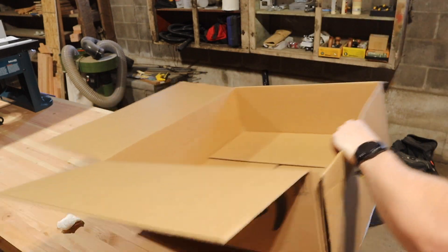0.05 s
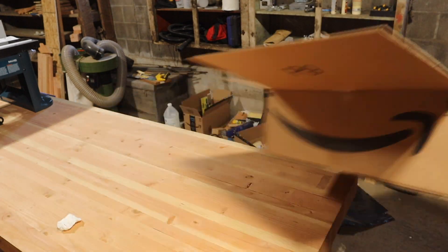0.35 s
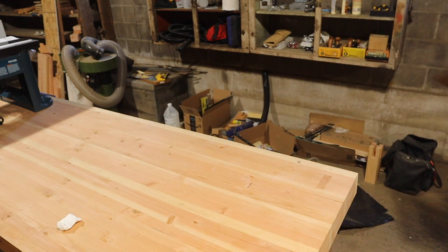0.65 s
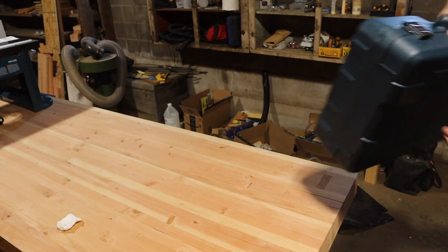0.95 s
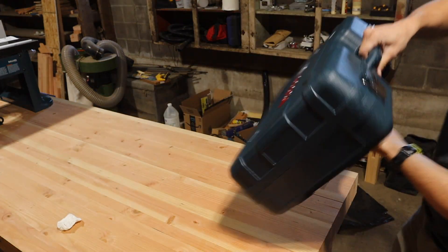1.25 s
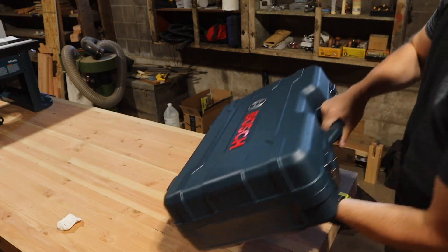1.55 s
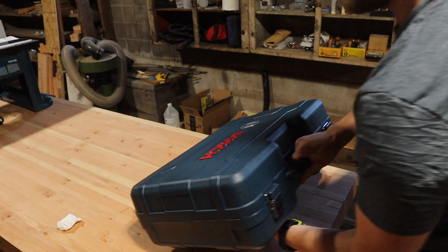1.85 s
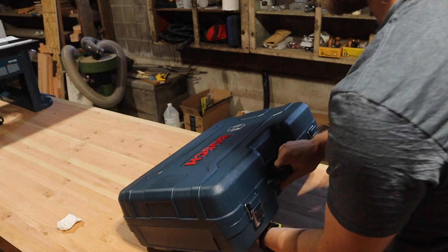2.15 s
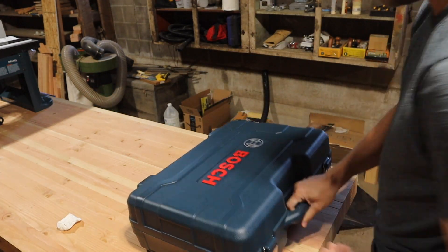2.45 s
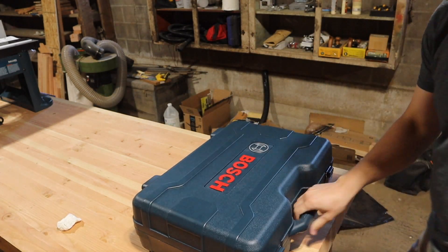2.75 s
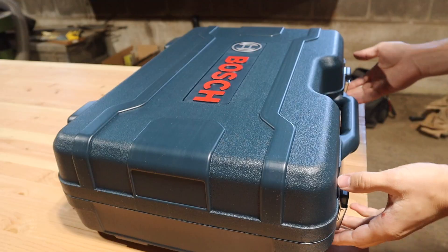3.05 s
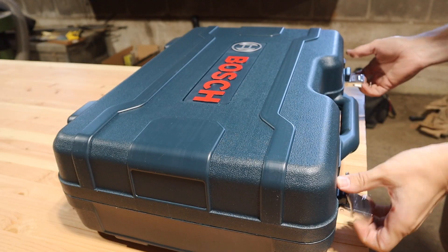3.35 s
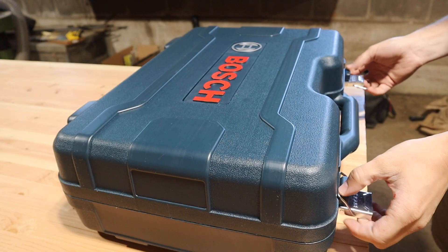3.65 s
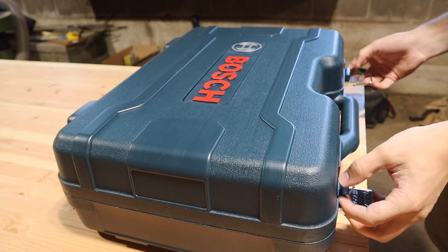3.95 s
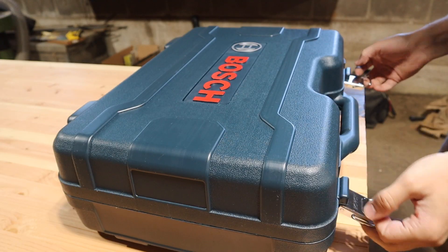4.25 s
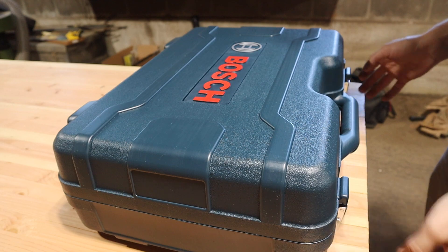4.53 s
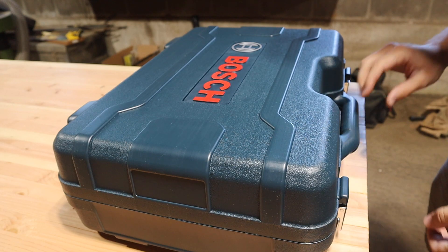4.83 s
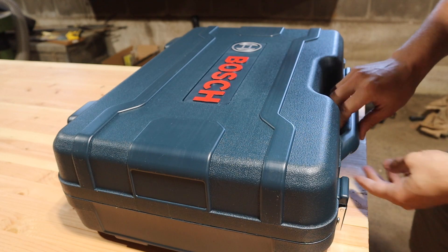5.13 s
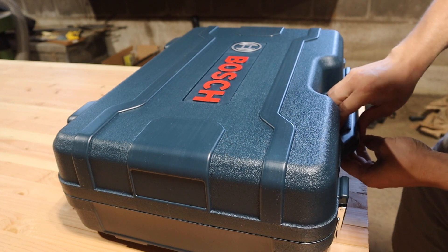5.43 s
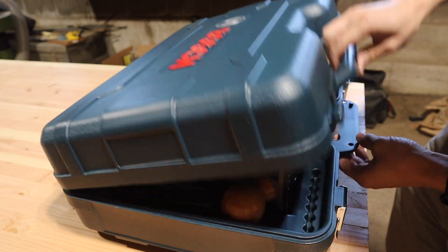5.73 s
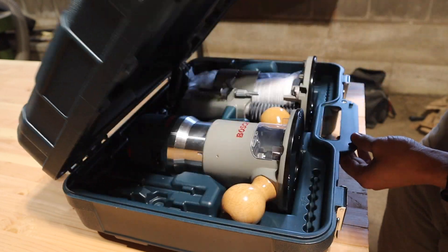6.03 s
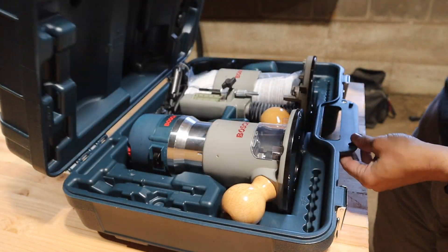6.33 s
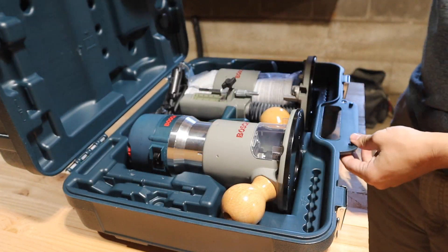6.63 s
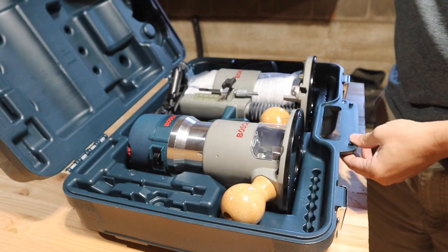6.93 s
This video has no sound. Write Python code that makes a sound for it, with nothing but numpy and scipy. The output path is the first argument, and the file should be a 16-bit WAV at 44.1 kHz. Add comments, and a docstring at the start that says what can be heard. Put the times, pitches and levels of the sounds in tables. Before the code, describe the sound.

A hollow plastic case thuds onto a wooden workbench, then two steel latches snap open and the lid lifts softly.

```python
"""In a block-walled workshop with a low motor hum, a cardboard box slides off a wooden workbench.
A hard plastic tool case is bumped, dragged and dropped flat on the bench; its hollow shell booms.
Two steel latches snap open, ring, jingle on their wire loops and fall against the shell.
Then the lid is raised with a small pop and a rustle. The walls echo, and the microphone is so
close that the loudest snaps overload it."""
import sys
import numpy as np
from scipy import signal
from scipy.fft import rfft, irfft, next_fast_len
from scipy.io import wavfile
from scipy.ndimage import uniform_filter1d, minimum_filter1d

SR = 44100
rng = np.random.default_rng(int(sys.argv[2]) if len(sys.argv) > 2 else 0)


def inscribe(sig):
    """Save sig as 16-bit PCM at rate SR to the path in sys.argv[1].

    A 1-D sig is mono; a 2-D sig holds one channel per row.
    Samples are clipped to [-1, 1] before scaling.
    """
    pcm = np.round(np.clip(np.atleast_2d(sig).T, -1, 1) * 32767)
    wavfile.write(sys.argv[1], SR, pcm.astype(np.int16))


N = 308167
TIME = np.arange(N) / SR
AGE = TIME[:SR // 3]  # seconds since a hit
EDGES = 30 * 2 ** np.arange(0, 9.6, .5)  # borders of half-octave bands, in Hz
CENTRES = np.sqrt(EDGES[1:] * EDGES[:-1])
BAND_FILTERS = [signal.butter(2, pair, "band", fs=SR, output="sos") for pair in zip(EDGES, EDGES[1:])]
# the case comes to rest; the hand takes the far latch; it lets that latch drop
SETTLED_S, FAR_LATCH_S, DROP_S = 3.0, 4.14, 4.595

# the case bumps the bench, hands and lid bump the case:
# t/s, level/dB, bass boost/dB, treble boost/dB, rebound against first hit/dB
KNOCKS = [(0.723, -32.5, -5, -12, -18), (1.145, -18, 4, -13, -4.5), (1.198, -28, 11.5, -20, -18),
          (1.377, -24, 15, 1.5, -7), (1.413, -2.5, -1, -25, -13.5), (1.973, -10, 4, -9, -12.5),
          (2.114, -28.5, 10, -6, -10), (2.305, -21, -5, -11.5, -6), (2.549, -18, 2, -3, -1),
          (2.595, 0.5, -2.5, 4.5, 0.5), (2.663, -11, 11.5, 1, -10), (3.08, -27.5, 6, -7, -14),
          (3.146, -21.5, -4, 0, 4), (3.533, -2.5, -17, -5.5, -29), (3.71, -17.5, -5, -6, -18.5),
          (4.357, -26.5, 1.5, -9.5, -3), (4.408, -22.5, -8, -13, -11.5), (4.514, -21.5, 6, -3.5, -9),
          (5.223, -45.5, 23.5, 2, -5), (5.345, -38.5, 14.5, -3, -8), (5.431, -37, -3, -4, -14),
          (5.572, -23.5, -5, -22, 2), (5.655, -33.5, 6, -21, -10), (6.799, -17, -11, -41, -26)]
# the notes (modes) of the hollow shell: f/Hz, level/dB, t60/s (the time to fade by 60 dB)
SHELL_MODES = [(122, -5.5, 0.056), (152.7, -9, 0.27), (178.4, -2, 0.34), (236.4, -2, .2), (316.5, -2, .18),
               (369.5, 6, 0.044), (512, -0.5, 0.13), (572, -3.5, 0.2), (660, -1.5, 0.19), (801, -10, 0.085),
               (914, 0.5, 0.14), (1060, -9.5, .09), (1260, -23, .1), (1484, -13, 0.055),
               (1715, -11.5, 0.023), (2430, -22, 0.048)]
# how long its many weaker notes last: f/Hz, t60/s
SHELL_T60 = [(100, 0.19), (500, .085), (2000, 0.053), (10000, 0.044)]
# a latch lever springs open or falls on the shell:
# t/s, steel level/dB, ring boost/dB, shell level/dB, bass boost/dB, scrape level/dB
SNAPS = [(3.3374, 5.5, 3.5, -1.5, 3, -15), (3.396, 4.5, -1, -7.5, 5.5, -7), (4.5993, -1, 1.5, -3, 1, -13),
         (4.833, -5, -14.5, -9.5, 4, -48)]
# each snap is a release, a slap and two bounces: delay/s, steel change/dB, shell change/dB
SNAP_CONTACTS = [(0, -1, -0.5), (.0072, -4, -2), (.017, -11.5, -15.5), (.031, -15, -26)]
# a held latch ticks against its catch: t/s, steel level/dB, shell level/dB
TICKS = [(3.264, -15, -35.5), (3.3026, -16.5, -21.5), (3.354, 1, -14), (3.4498, -7, -14),
         (3.5324, -11, -27.5), (3.728, -19.5, -17), (3.763, -17.5, -34.5), (3.813, -21, -35.5),
         (3.8637, -16.5, -25), (3.9498, -21.5, -27), (4.0583, -23.5, -43), (4.1179, -22.5, -27.5),
         (4.1475, -13.5, -23), (4.3378, -30, -47.5), (4.38, -29, -42), (4.588, -12.5, -21.5),
         (4.8555, -8.5, -40), (5.1968, -36.5, -39.5), (5.2516, -32, -40)]
# a loose wire loop jingles: t/s, length/s, steel level/dB, shell level/dB
JINGLES = [(2.596, .02, -17.5, -35), (4.184, .052, -23.5, -28.5), (4.434, .05, -26.5, -42),
           (4.507, .02, -21.5, -35)]
# the notes of the two latches: f/Hz, level/dB, t60/s
NEAR_LATCH_MODES = [(3120, -8, 0.04), (4680, -14, 0.04), (6300, -13.5, 0.017), (7920, -8.5, 0.09),
                    (8840, -8.5, 0.061), (8510, 0.5, 0.019), (8160, -0.5, 0.045), (9400, -13, 0.056),
                    (12060, -12, 0.026), (13500, -5.5, 0.023), (14700, -18, .04), (15400, -18.5, 0.027)]
FAR_LATCH_MODES = [(3040, -16, .12), (4905, -13, .3), (5440, -22, .06), (6440, -23, .12), (7520, -19, .2),
                   (7850, -17, .2), (8403, -1, .18), (9300, -15, .14), (11690, -18, .17), (12000, -22, .2),
                   (13530, -16, .13), (13820, -12, .2), (14700, -21, .09), (15300, -14, .12)]
# the wire loop slides on its catch: t/s, length/s, level/dB
SLIDES = [(3.807, 0.011, -43), (3.847, .016, -43), (3.932, .018, -52.5), (4.108, 0.0098, -46),
          (4.155, 0.066, -45.5), (4.432, 0.12, -46.5)]
# box, case and palms drag under pressure: t/s, length/s, level/dB
DRAGS = [(0, 0.024, -45.5), (0.125, 0.083, -42.5), (1.29, .1, -53), (1.937, 0.26, -40), (2.19, .1, -44.5),
         (2.306, 0.053, -39.5), (3.203, 0.82, -46), (4.563, 0.025, -30), (4.696, 0.42, -50.5),
         (5.533, 0.052, -45), (6.43, 0.037, -57.5), (6.726, 0.054, -53), (6.796, .2, -50.5)]
# cardboard, sleeves and palms brush past: peak t/s, rise/s, level/dB, hiss against rustle/dB
STROKES = [(0.017, 0.033, -42.5, -0.5), (.175, 0.057, -47.5, -0.5), (0.448, 0.01, -44, -9.5),
           (0.811, 0.029, -50.5, -6.5), (1.144, 0.017, -48.5, -4), (1.42, 0.074, -53.5, -4),
           (1.547, 0.0054, -46.5, -6.5), (2.375, 0.077, -47, -1.5), (3.08, 0.0027, -53.5, -2),
           (3.155, .012, -49, -7), (5.585, .02, -57, -5.5), (6.28, .18, -57.5, -9),
           (6.458, 0.019, -60.5, -10.5), (6.96, .16, -58.5, -5.5)]
# plastic and cardboard squeak: t/s, length/s, f/Hz, level/dB
SQUEAKS = [(0.446, 0.007, 3120, -52), (0.98, 0.0068, 2170, -49), (2.043, 0.0028, 1750, -38.5),
           (2.053, 0.0064, 1775, -33), (2.113, 0.0031, 1610, -41), (2.194, 0.005, 1737, -37.5),
           (2.239, 0.0031, 1600, -44), (5.578, 0.017, 1368, -43)]
# small dry pops: t/s, level/dB
POPS = [(1.01, -37.5), (6.2619, -31.5)]
# tone colours, or how strong each sound is from low to high: f/Hz, level/dB
SHELL_COLOUR = [(40, -23.5), (90, -23), (140, 6), (260, 6.5), (450, 6), (1000, 2), (2000, -5.5),
                (4000, -13.5), (8000, -36.5), (11000, -42), (15000, -44)]
CRACK_COLOUR = [(300, 4), (1200, 3.5), (3200, -3), (6000, -3.5), (8200, 4), (10800, -15.5), (14000, -4.5)]
RUSTLE_COLOUR = [(200, -11), (800, 1), (1200, -2.5), (1750, 3), (2250, -1.5), (3000, -0.5), (3700, -4.5),
                 (4600, -2.5), (8000, -32.5), (15000, -31.5)]
HISS_COLOUR = [(1000, -14), (4000, -3), (8000, 2.5), (10500, -6), (15000, -8)]
DRAG_COLOUR = [(50, -12), (110, 2.5), (350, 5.5), (700, -5.5), (1500, -13), (4000, -28), (12000, -45.5)]
BENCH_COLOUR = [(35, -16), (70, 0.5), (150, -1.5), (300, -22.5), (1000, -56.5)]
AIR_COLOUR = [(30, -22), (85, -0.5), (170, -7), (400, -10.5), (1200, -18.5), (4000, -26.5), (9000, -29.5),
              (15000, -36)]
# how long the room echoes: f/Hz, t60/s
ROOM_T60 = [(100, 0.23), (300, 0.92), (1000, 0.72), (3000, 0.58), (8000, .44), (15000, 0.24)]
# the echo against the direct sound: f/Hz, level/dB
ECHO_LEVEL = [(90, -14.5), (170, -4.5), (270, -9.5), (500, -9), (1000, -8.5), (2500, -10.5), (8000, -11),
              (15000, -25.5)]
# the part of the echo that is scattered into noise: f/Hz, share from 0 to 1
ECHO_SCATTER = [(100, 0.89), (900, 0.78), (5000, 0.78), (9000, 0.042)]
# the echo dips briefly: t/s, level/dB
ECHO_DIP = [(2.95, 0), (2.96, -13), (3.07, -13), (3.08, 0)]
# the level of the motor hum over time: t/s, level/dB
HUM_LEVEL = [(0, -69), (2.8, -66.5), (3.0, -59.5), (7, -54.5)]


def case_knocks(rebound_s=.019, rebound_bass_db=6, rebound_treble_db=-2):
    """List the blows on the case: after each knock it lands on its other edge, deeper and duller."""
    blows = []
    for s, db, bass_db, treble_db, rebound_db in KNOCKS:
        blows.append((s, db, bass_db, treble_db))
        blows.append((s + rebound_s, db + rebound_db,
                      bass_db + rebound_bass_db, treble_db + rebound_treble_db))
    return blows


def shell(blows, pulse_db=8, crowd_db=14, modes_db=12, rise_cycles=0.26):
    """A blow on the plastic shell makes one thump, a few clear notes and a crowd of short ones."""
    out, band_hiss = np.zeros(N), band_noise(N + len(AGE))
    hz, mode_db, t60 = np.transpose(SHELL_MODES)
    cycles = hz[:, None] * AGE
    rings = unit_energy(np.sin(2 * np.pi * cycles) * (1 - np.exp(-2 * cycles)) * fade(AGE, t60))
    impulse = 1. * (AGE == 0)
    pulses = [signal.sosfilt(sos, impulse) * (-1) ** k for k, sos in enumerate(BAND_FILTERS)]
    pulses = unit_energy(np.array(pulses))
    crowd_rise = 1 - np.exp(-CENTRES[:, None] * AGE / rise_cycles)
    crowd_shape = crowd_rise * fade(AGE, at_hz(SHELL_T60, CENTRES))
    colour = unit_energy(from_db(at_hz(SHELL_COLOUR, CENTRES)) * np.sqrt(CENTRES))
    for s, db, bass_db, treble_db in blows:
        # only the moving case has the weight to shake the bench
        deep_db, lowest_hz = (-12, 115) if s > SETTLED_S else (5, 35)
        start = int(s * SR)
        bands = colour * blow_tone(CENTRES, bass_db, deep_db, treble_db)
        crowd = bands @ unit_energy(band_hiss[:, start:start + len(AGE)] * crowd_shape)
        # where the blow lands sets how strongly each note answers
        shares = unit_energy(from_db(mode_db + 2.5 * rng.standard_normal(len(hz))))
        shares *= rng.choice([-1, 1], len(hz))
        modes = shares * blow_tone(hz, bass_db, deep_db, treble_db) @ rings
        blow = from_db(pulse_db) * bands @ pulses + from_db(crowd_db) * crowd + from_db(modes_db) * modes
        add(out, s, cut_bass(from_db(db) * blow, lowest_hz))
    return out


def blow_tone(hz, bass_db, deep_db, treble_db, pivot_hz=350, treble_hz=3000, bend=0.91):
    """A heavy blow is stronger below the pivot pitch; a hard blow is brighter above it."""
    height = np.maximum(np.log(hz / pivot_hz), 0) / np.log(treble_hz / pivot_hz)
    weight_db = at_hz([(70, bass_db + deep_db), (150, bass_db), (pivot_hz, 0)], hz)
    hardness_db = np.minimum(treble_db * height ** bend, max(treble_db, 0))
    return from_db(weight_db + hardness_db)


def latch_contacts(snap_treble_db=7.5, tick_ring_db=-13, jingle_ring_db=2,
                   gap_s=.0148, jitter_s=.001, uneven_db=3, loss_db=1.3):
    """List every snap, tick and jingle: each one clicks the steel and gives the shell a blow."""
    clicks, blows = [], []
    light_bass_db, light_treble_db = 2, 2.5
    for s, steel_db, ring_db, shell_db, bass_db, _ in SNAPS:
        for delay_s, steel_step_db, shell_step_db in SNAP_CONTACTS:
            clicks.append((s + delay_s, steel_db + steel_step_db, ring_db))
            blows.append((s + delay_s, shell_db + shell_step_db, bass_db, snap_treble_db))
    for s, steel_db, shell_db in TICKS:
        clicks.append((s, steel_db, tick_ring_db))
        blows.append((s, shell_db, light_bass_db, light_treble_db))
    for s, length_s, steel_db, shell_db in JINGLES:
        for k, (late, strong) in enumerate(rng.standard_normal(size=(6, 2))):
            if k * gap_s < length_s:
                touch_s = s + k * gap_s + jitter_s * late
                touch_db = uneven_db * strong - k * loss_db
                clicks.append((touch_s, steel_db + touch_db, jingle_ring_db))
                blows.append((touch_s, shell_db + touch_db, light_bass_db, light_treble_db))
    return clicks, blows


def latches(clicks, crack_db=4, clink_db=4, near_db=9, far_db=12, lead_s=0.0045, scrape_s=0.0064):
    """Steel hits steel with a crack, a clink and a ring; each snap also scrapes for a moment."""
    out, grit = np.zeros(N), noise(CRACK_COLOUR)
    for s, db, ring_db in clicks:
        crack = unit_energy(grit[int(s * SR):][:len(AGE)] * fade(AGE, t60=0.028)[0])
        if s < FAR_LATCH_S:
            ring = from_db(near_db) * steel_ring(NEAR_LATCH_MODES, strain=0.031)
        elif s < DROP_S:  # fingers damp and bend the far latch until it drops
            ring = from_db(far_db) * steel_ring(FAR_LATCH_MODES, strain=0.008, length_share=0.44)
        else:
            ring = from_db(far_db) * steel_ring(FAR_LATCH_MODES, strain=0.0025)
        click = from_db(crack_db) * crack + from_db(clink_db) * clink() + from_db(ring_db) * ring
        add(out, s, from_db(db) * click)
    for s, *_, scrape_db in SNAPS:
        # the lever scrapes over its catch, harder and harder until it lets go
        pressure = np.minimum(AGE / lead_s, 1) ** 2 * burst(lead_s + scrape_s)
        scrape = grit[rng.integers(N - len(AGE)):][:len(AGE)]
        add(out, s - lead_s, from_db(scrape_db) * pressure * scrape)
    return cut_bass(out, lowest_hz=500)  # parts this small give off no bass


def steel_ring(modes, strain, length_share=1, pair_spread=.009):
    """Lever and wire loop ring in close pairs of notes that waver; strain pulls them out of tune."""
    hz, mode_db, t60 = np.transpose(np.repeat(modes, 2, axis=0))
    detune, strength, phase = rng.standard_normal((3, len(hz)))
    pitch = hz * (1 + pair_spread * (np.arange(len(hz)) % 2) + strain * detune)
    notes = np.sin(2 * np.pi * (pitch[:, None] * AGE + phase[:, None])) * fade(AGE, t60 * length_share)
    return unit_energy(from_db(mode_db + 3.8 * strength) @ notes)


def clink(t60=0.042, count=12, low_hz=1900, high_hz=10000):
    """Each spot that is hit on the steel has its own few high notes, which die quickly."""
    place, phase = rng.random((2, count))
    hz = low_hz * (high_hz / low_hz) ** ((np.arange(count) + place) / count)
    notes = np.sin(2 * np.pi * (hz[:, None] * AGE + phase[:, None]))
    return unit_energy(notes.sum(axis=0) * fade(AGE, t60)[0])


def sliding_loop():
    """The wire loop slides on its steel catch with a thin, grainy scratch."""
    level, scratch = np.zeros(N), noise(HISS_COLOUR) * flutter(per_s=440, depth_db=9)
    for s, length_s, db in SLIDES:
        add(level, s, from_db(db) * burst(length_s, release_s=.004))
    return level * scratch


def rubbing(attack_s=0.033, release_s=0.069, drag_rustle_db=-20.5, bench_db=-6,
            usual_fall_s=.052, usual_db=-50.5, halving_db=14):
    """Heavy drags rumble through the hollow box and case and the bench top; light strokes rustle."""
    rumble, hiss = np.zeros((2, N))
    for s, length_s, db in DRAGS:
        attack = np.clip((TIME - s) / attack_s, 0, 1)
        release = np.exp(-np.clip((TIME - s - length_s) / release_s, 0, 20))
        rumble = np.maximum(rumble, from_db(db) * attack * release)
    rustle = from_db(drag_rustle_db) * rumble
    for s, rise_s, db, hiss_db in STROKES:
        # a firm stroke stops short, a light one trails off
        fall_s = usual_fall_s * 2 ** ((usual_db - db) / halving_db)
        below_peak = np.where(TIME < s, ((s - TIME) / rise_s) ** 2 / 2, (TIME - s) / fall_s)
        stroke = from_db(db) * np.exp(-np.minimum(below_peak, 20))
        rustle += stroke
        hiss += from_db(hiss_db) * stroke
    brushing = rustle * noise(RUSTLE_COLOUR) + hiss * noise(HISS_COLOUR)
    brushing *= flutter(per_s=570, depth_db=2.5)
    bench_boom = from_db(bench_db) * (TIME < SETTLED_S) * noise(BENCH_COLOUR)
    dragging = rumble * (noise(DRAG_COLOUR) + bench_boom) * flutter(per_s=90, depth_db=4)
    return brushing + dragging


def squeaks(wobble=0.17, overtone_db=-12):
    """Plastic and cardboard stick and slip at an unsteady rate, so the pitch wobbles."""
    out = np.zeros(N)
    for s, length_s, hz, db in SQUEAKS:
        unsteady = rms_one(uniform_filter1d(rng.standard_normal(len(AGE)), size=24))
        phase = 2 * np.pi * np.cumsum(hz * (1 + wobble * unsteady)) / SR
        tone = np.sqrt(2) * (np.sin(phase) + from_db(overtone_db) * np.sin(2 * phase))
        add(out, s, from_db(db) * burst(length_s) * tone)
    return out


def pops(hz=650, swell_s=0.00098):
    """A small dry pop as the case is lifted, another as the lid swings up."""
    out = np.zeros(N)
    swell = AGE / swell_s * np.exp(1 - AGE / swell_s)
    for s, db in POPS:
        add(out, s, from_db(db) * swell * np.sin(2 * np.pi * hz * AGE))
    return out


def workshop_echo(x, build_s=0.0032):
    """Echoes off block walls keep the pitch of a ring; cluttered shelves blur the rest into noise."""
    t = TIME[:SR]
    tails = unit_energy(fade(t, at_hz(ROOM_T60, CENTRES)) * (1 - np.exp(-t / build_s)))
    level, scattered = from_db(at_hz(ECHO_LEVEL, CENTRES)), at_hz(ECHO_SCATTER, CENTRES)
    wall_gains = level * np.sqrt((1 - scattered) * 2 * np.diff(EDGES) / SR)
    wall_echoes = wall_gains @ unit_energy(band_noise(SR) * tails)
    out = signal.fftconvolve(x, wall_echoes)[:N]
    for sos, tail, gain, wash in zip(BAND_FILTERS, tails, level * np.sqrt(scattered), band_noise(N)):
        # the room stores the energy of each band and lets it leak away
        stored = signal.oaconvolve(signal.sosfilt(sos, x) ** 2, tail ** 2)[:N]
        out += gain * np.sqrt(np.abs(stored)) * wash
    return out


def motor_and_air(hum_hz=86.1, air_db=-57):
    """A motor hums one wavering low note over the faint noise of still air."""
    hum = np.sqrt(2) * np.sin(2 * np.pi * hum_hz * TIME) * flutter(per_s=34, depth_db=1)
    return gain_curve(HUM_LEVEL) * hum + from_db(air_db) * noise(AIR_COLOUR)


def from_db(db):
    """Turn decibels into a gain to multiply by."""
    return 10 ** (np.asarray(db) / 20)


def rms_one(x):
    """Scale each row so that its average level (rms) is 1."""
    return x / np.sqrt(np.mean(x ** 2, axis=-1, keepdims=True) + 1e-20)


def unit_energy(x):
    """Scale each row so that its squares add up to 1."""
    return rms_one(x) / np.sqrt(x.shape[-1])


def at_hz(points, hz):
    """Read between the rows of a table, giving each octave equal room."""
    table_hz, values = np.transpose(points)
    return np.interp(np.log(hz), np.log(table_hz), values)


def gain_curve(rows):
    """Join rows of t/s, level/dB into a gain that moves with time."""
    return from_db(np.interp(TIME, *np.transpose(rows)))


def fade(t, t60):
    """Curves that fall 60 dB in t60 seconds, one row for each t60."""
    return np.exp(-np.log(1000) * t / np.reshape(t60, (-1, 1)))


def burst(length_s, release_s=0.0015):
    """The level of a short slip: full while it lasts, then quickly gone."""
    return np.exp(-np.maximum(AGE - length_s, 0) / release_s)


def flutter(per_s, depth_db):
    """A gain that wanders at random, rms 1."""
    steps = rng.standard_normal(N // 10)
    return rms_one(from_db(depth_db * np.interp(TIME * per_s, np.arange(len(steps)), steps)))


def band_noise(size):
    """One row of noise for each band; neighbours are unrelated."""
    white = rng.standard_normal((2, size + SR // 2))
    bands = [signal.sosfilt(sos, white[k % 2])[-size:] for k, sos in enumerate(BAND_FILTERS)]
    return rms_one(np.array(bands))


def noise(colour):
    """Steady noise with the given tone colour, rms 1."""
    size = next_fast_len(N)
    hz = np.maximum(np.arange(size // 2 + 1) * SR / size, 1)
    spectrum = rfft(rng.standard_normal(size)) * from_db(at_hz(colour, hz))
    return rms_one(irfft(spectrum, size)[:N])


def cut_bass(x, lowest_hz):
    """Turn down what lies below lowest_hz."""
    return signal.sosfilt(signal.butter(2, lowest_hz, "high", fs=SR, output="sos"), x)


def add(out, s, sound, delay_s=.001):
    """Mix in a sound starting one millisecond after time s."""
    start = int((s + delay_s) * SR)
    out[start:start + len(sound)] += sound[:N - start]


def scene():
    """Case, latches and hands in the workshop, as one channel."""
    clicks, latch_blows = latch_contacts()
    direct = shell(case_knocks() + latch_blows) + latches(clicks) + sliding_loop()
    direct += squeaks() + rubbing()
    echo = gain_curve(ECHO_DIP) * workshop_echo(direct)
    return (direct + echo + pops() + motor_and_air())[None]


def record(dry, ceiling=1.4, clip_level=.97, cutoff_hz=15700):
    """A fast limiter turns the loudest snaps down, their peaks flatten, and the top treble is cut."""
    safe_gain = minimum_filter1d(ceiling / np.maximum(np.abs(dry), ceiling), size=45)
    limited = dry * uniform_filter1d(safe_gain, size=45)
    clipped = limited / (1 + (limited / clip_level) ** 10) ** (1 / 10)
    return signal.sosfilt(signal.ellip(10, .2, 70, cutoff_hz, fs=SR, output="sos"), clipped)


dry = scene()
out = record(dry)
inscribe(out)
```